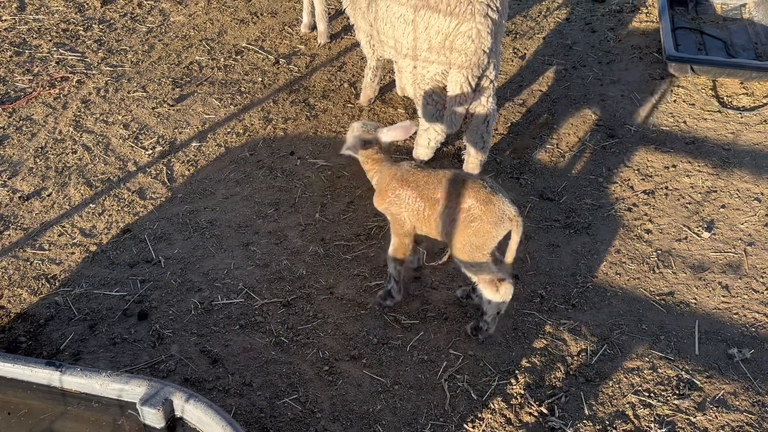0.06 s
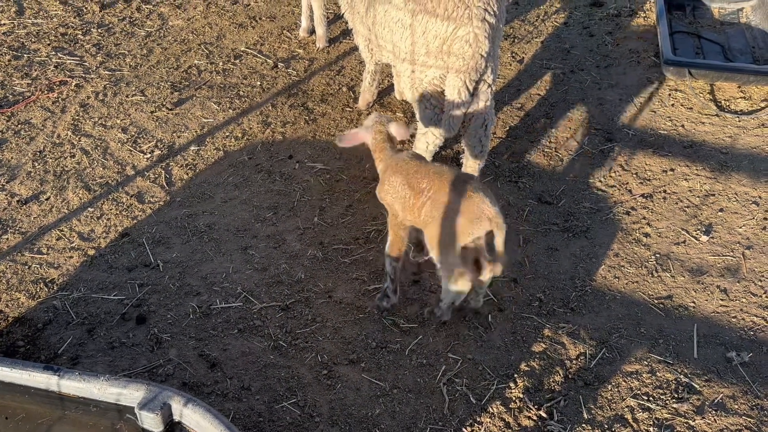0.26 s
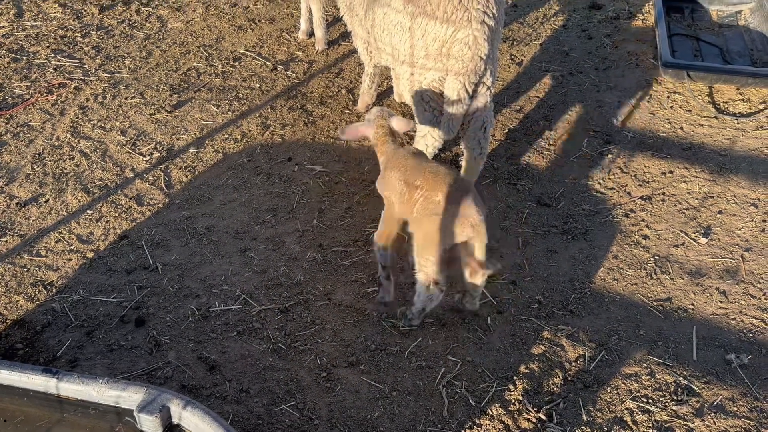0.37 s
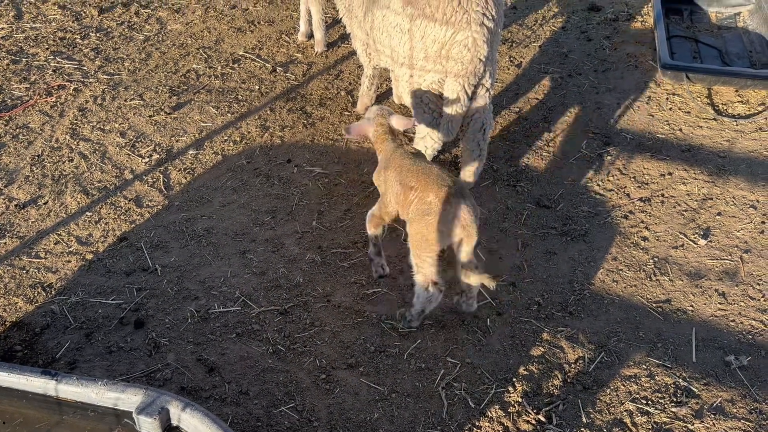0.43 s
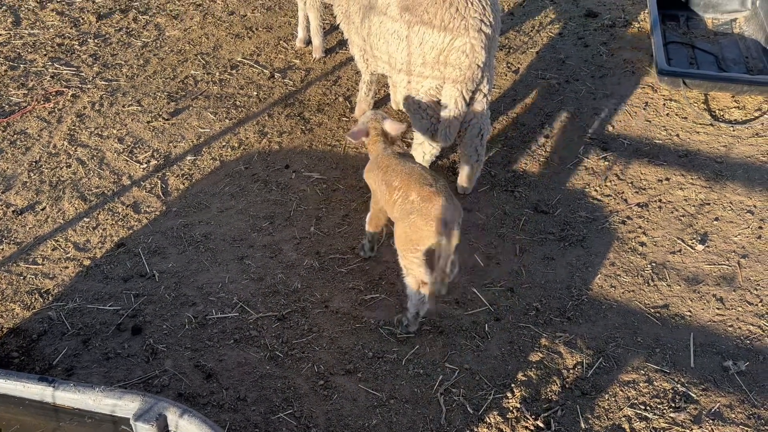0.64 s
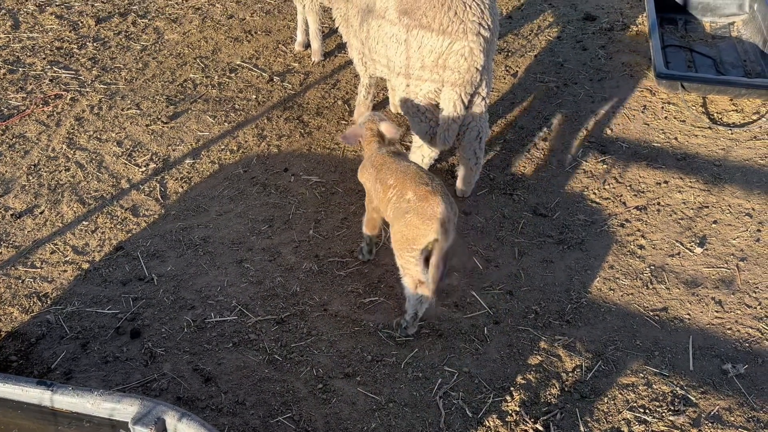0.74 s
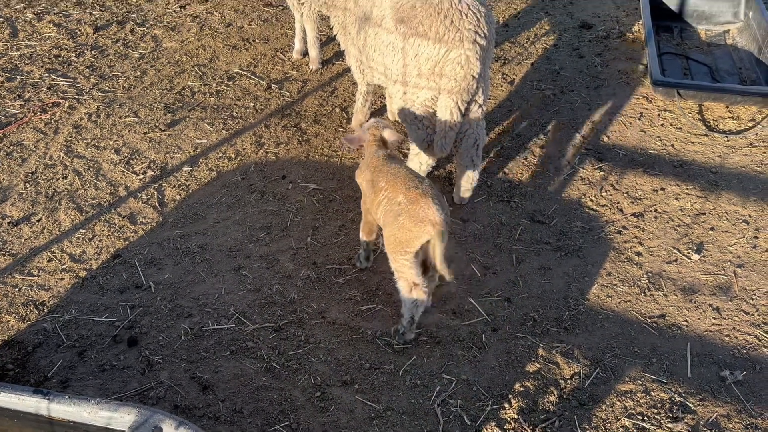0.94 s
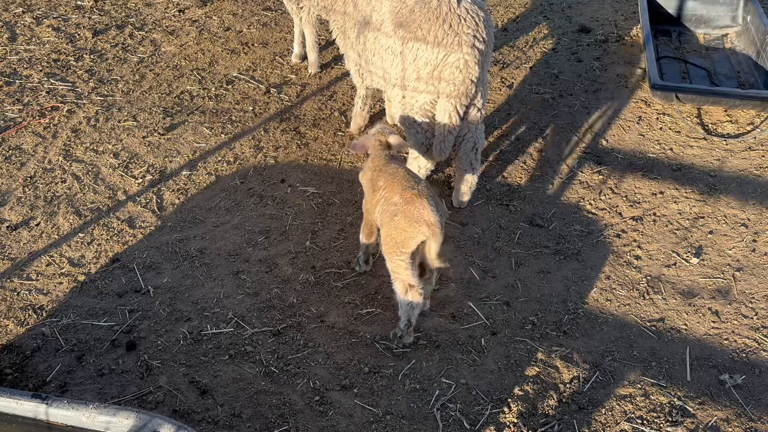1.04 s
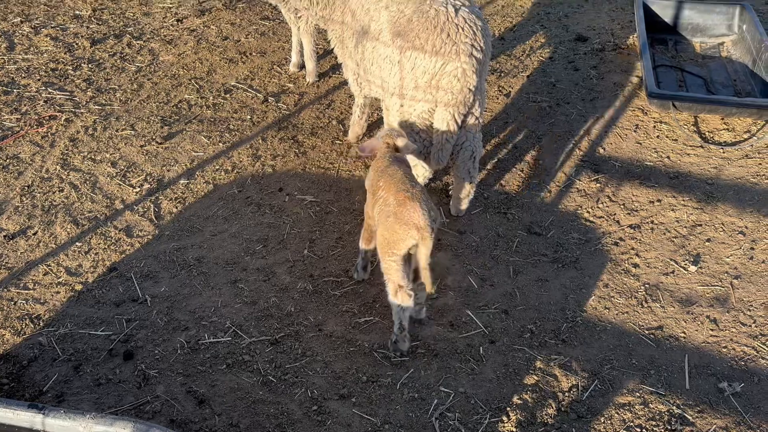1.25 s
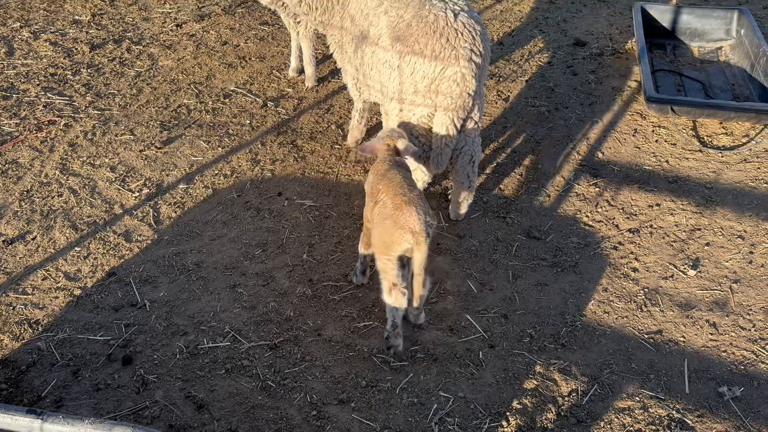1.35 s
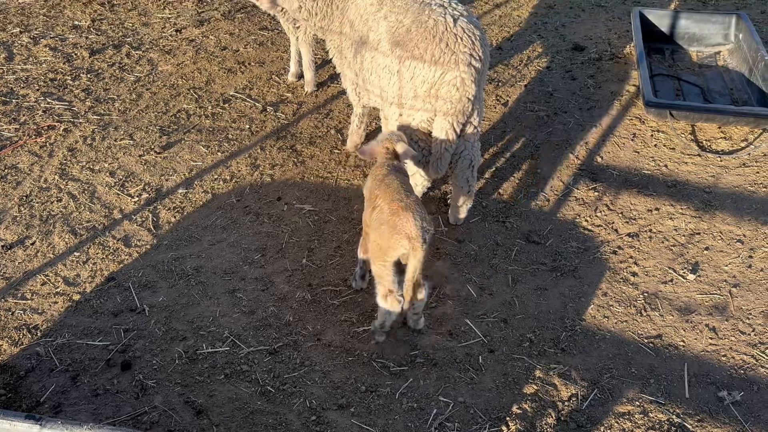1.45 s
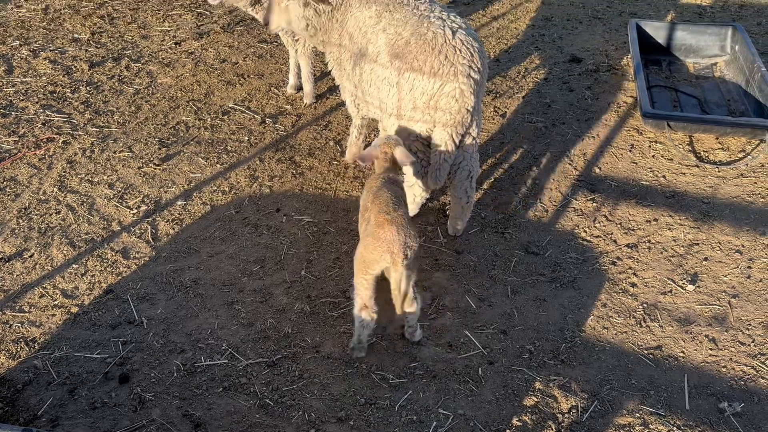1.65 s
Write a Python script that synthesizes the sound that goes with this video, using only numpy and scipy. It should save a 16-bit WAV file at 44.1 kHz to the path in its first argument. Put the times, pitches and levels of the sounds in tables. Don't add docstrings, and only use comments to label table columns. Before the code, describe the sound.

Outdoors in a farm pen, one sheep bleats near the phone: a brief muffled hum rising in pitch, a sustained raspy call, a weakening end, then only wind buffeting and a few faint straw ticks.

```python
import sys
import numpy as np
from scipy import signal
from scipy.fft import rfft, irfft, next_fast_len
from scipy.io import wavfile
from scipy.ndimage import uniform_filter1d

SR = 44100
rng = np.random.default_rng(int(sys.argv[2]) if len(sys.argv) > 2 else 0)


def materialize(psi):
    bounded = np.clip(np.atleast_2d(psi).T, -1, 1)
    quanta = np.round(bounded * 32767).astype(np.int16)
    wavfile.write(sys.argv[1], SR, quanta)


def gain_from_db(level_db):
    decades = np.asarray(level_db, float) / 20
    return 10 ** decades


N = 74970
T = np.arange(N) / SR
SIZE = next_fast_len(N + SR // 2)
F = np.maximum(np.fft.rfftfreq(SIZE, 1 / SR), 1e-3)

# time in seconds, pitch in Hz, level in dB.
GRUNT = [
    (0.11, 134.4, -75.5),
    (0.118, 127.1, -67),
    (0.144, 128.9, -44),
    (0.17, 118.2, -52),
    (0.204, 145.6, -41.5),
    (0.242, 163.1, -38),
    (0.266, 171.7, -37),
    (0.3, 176.3, -36.5),
]
# time in seconds, pitch in Hz, level in dB.
BLEAT = [
    (0.32, 180.5, -25.5),
    (0.344, 183.8, -22.5),
    (0.366, 173.1, -25.5),
    (0.382, 182.7, -21.5),
    (0.466, 179.1, -21.5),
    (0.57, 178.6, -21.5),
    (0.608, 177.1, -21),
    (0.685, 182, -21),
    (0.74, 179.9, -21),
]
# time in seconds, pitch in Hz, level in dB.
SAG = [
    (.787, 183.4, -22),
    (.812, 174.5, -23),
    (.845, 172.7, -26),
    (.87, 176.2, -25),
    (.906, 172, -24),
    (.927, 166.7, -30.5),
    (.95, 174.4, -24),
    (.982, 169.8, -26.5),
]
# time in seconds, pitch in Hz, level in dB.
RELEASE = [
    (.991, 164, -36.5),
    (1.006, 149, -34),
    (1.022, 137.1, -49),
    (1.07, 125.8, -65),
]
# time in seconds, timing scatter as a share of a period.
ROUGHNESS = [(.11, .04), (.19, .03), (.22, .003), (.345, .003), (.36, .012), (.385, .005), (.61, .005),
             (.64, .0015), (.79, .0015), (.81, .003), (.978, .003), (.995, .08)]
# time in seconds, strength of the strong-weak pattern in dB.
DOUBLING = [
    (.33, -40),
    (.355, -4),
    (.395, -9),
    (.46, -6.5),
    (.6, -7.5),
    (.625, -28),
    (.79, -34),
    (.81, -18),
    (.84, -30),
]
# centre in Hz, width in Hz, left in dB, right in dB.
DOUBLING_COLOUR = [(650, 40, 4.5, 2.5), (798, 49, -6, -0.5), (1050, 520, -10.5, -6),
                   (1517, 180, -13, -26.5), (2030, 40, 5.5, 2), (1990, 120, -5.5, -11), (2346, 110, 4, 12),
                   (2680, 150, -13, -2.5)]
# centre in Hz, width in Hz, left in dB, right in dB.
TIRED_COLOUR = [(1076, 120, -2, -6), (1480, 310, -6, -6.5), (1700, 190, 2.5, 4.5), (2260, 150, -4.5, -8.5),
                (2479, 390, 4.5, 7), (3298, 1000, 3.5, 2.5), (4380, 350, -2.5, -2), (5050, 800, 0, -5)]
# centre in Hz, width in Hz, left in dB, right in dB, right lag in ms.
SHUT_MOUTH = [(673, 160, -0.5, 2, 0.31), (832, 207, -1, -2, 0.074), (1103, 200, -3.5, -6.5, 0.099),
              (1690, 150, -1, -2.5, 0.37), (2045, 50, -4.5, -7, 0.28), (2990, 390, -10.5, -12, 0.16),
              (4700, 1100, -35.5, -30.5, 0.09), (7500, 1300, -29, -29.5, 0.058)]
# centre in Hz, width in Hz, left in dB, right in dB, right lag in ms.
OPEN_MOUTH = [(634, 110, -17.5, -45.5, 0.25), (736, 271, 1.13, 3, 0.26), (833.3, 123.6, 7.5, 7.5, 0.033),
              (1324, 657, -0.5, -5.5, 0.25), (1645, 120, 6.5, 1.5, 0.44), (1930, 142, 9, 2, 0.19),
              (2145, 150, 2, -9.5, 0.15), (2500, 220, -45, -8, 0.32), (2910, 430, -12.5, -12.5, 0.14),
              (3353, 180, -15.5, -13.5, 0.2), (3607, 360, -19, -20.5, 0.18),
              (4083, 360, -30.5, -33.5, 0.35), (4820, 900, -34.5, -32.5, 0.19),
              (6600, 2500, -33.5, -39.5, 0.055)]
# time in seconds, level relative to the voice in dB.
CHEST = [
    (.11, 8),
    (.2, -5),
    (.25, 1.5),
    (.3, 0.5),
    (.34, -16.5),
    (.8, -20),
    (.95, -18),
    (1.05, -6),
]
# centre in Hz, width in Hz, level relative to the voice in dB.
TEETH_HISS = [(9760, 590, -36), (10230, 2900, -29), (12700, 2700, -38), (14630, 1600, -40.5)]
# time in seconds, level in dB.
AIR_PRESSURE = [(.2, -13), (.25, -2), (.31, -3), (.345, 2.5), (.45, 2.5), (.79, -1), (.83, 1), (.935, -9),
                (.96, -7), (1.0, -9.5), (1.04, 4.5)]
# time in seconds, level in dB.
GUST = [(0, -51), (.1, -62), (.16, -52), (.3, -58), (.385, -41), (.505, -39), (.63, -45), (.7, -40),
        (.95, -46), (1.005, -58), (1.075, -60), (1.14, -43), (1.2, -50), (1.305, -40), (1.505, -37),
        (1.6, -41), (1.64, -47), (1.675, -60)]
# time in seconds, peak in dB, frequency in Hz.
THUMPS = [(0.026, -47, 52.5), (0.069, -53, 61), (0.203, -46, 68), (.262, -38.5, 55), (0.337, -44, 66.8),
          (0.38, -31.5, 63), (.417, -34.5, 79), (.449, -33, 63), (.474, -42, 57.4), (0.512, -29.5, 83.46),
          (0.555, -31.5, 78), (0.617, -39, 61), (.654, -37, 88.3), (0.683, -30, 71.5), (0.709, -32, 71),
          (0.759, -36.5, 65), (.803, -37.5, 63.64), (0.855, -36.5, 47.77), (0.901, -42, 55),
          (.944, -39, 61), (.985, -47, 54), (1.043, -39, 67), (1.101, -43, 55.5), (1.139, -34.5, 59),
          (1.174, -43.5, 59.94), (1.223, -41, 69), (1.259, -36.5, 53.7), (1.309, -28.5, 78.5),
          (1.363, -32, 60), (1.385, -32.5, 62), (1.431, -30, 69.4), (1.458, -32.5, 90), (1.491, -25, 85),
          (1.509, -23.5, 61.5), (1.557, -32, 67), (1.585, -36.5, 71.3), (1.609, -32.5, 85)]
# time in seconds, level in dB, frequency in Hz, length in seconds.
BUFFETS = [
    (0.162, -41.5, 145, 0.02),
    (0.375, -37.5, 103, 0.009),
    (0.51, -38, 112, .012),
    (0.693, -47, 115.5, 0.025),
    (1.026, -56, 260.7, 0.012),
    (1.311, -40.5, 127, 0.0041),
    (1.378, -55.5, 137, 0.0087),
    (1.458, -35, 157.4, 0.0093),
    (1.48, -33, 146.5, 0.012),
    (1.543, -43, 127, 0.026),
]
# frequency in Hz, density in dB per Hz.
YARD_COLOUR = [(250, 4), (450, -13), (800, -14.5), (1300, -18.5), (1850, -9.5), (2700, -21.5),
               (4000, -26.5), (15500, -29.5)]
# start in seconds, level in dB, decay in ms.
STRAW_TICKS = [
    (1.479, -59.5, 4.6),
    (1.5409, -72.5, 1.8),
    (1.565, -80.5, 4.8),
    (1.6985, -59, 2),
]
# centre in Hz, width in Hz.
HOUSING_DIPS = [(4680, 150), (5650, 150), (8900, 700), (13100, 800)]

MOUTH_OPENS_S = 0.296


def sheep():
    call = list(GRUNT) + list(BLEAT) + list(SAG) + list(RELEASE)
    phase = fold_phase(call)
    even, uneven = fold_pulses(phase)
    puff, burst = breath_puffs(phase)
    breath_level = (gain_from_db(-32) + 6 * curve(ROUGHNESS)) * np.std(even)
    breath = breath_level * unit(puff * rng.standard_normal(N))
    source = even + uneven + breath
    tiredness = ramp(0.795, 0.025)
    source = source + tiredness * (tint(source, TIRED_COLOUR) - source)
    fade_in = np.clip((T - call[0][0]) / 0.0071, 0, 1)
    fade_out = np.clip((call[-1][0] - T) / 0.019, 0, 1)
    loud = fade_in * fade_out * gain_from_db(curve(call, col=2) + 2)
    return mouth(source, even, loud) + chest_tone(phase, loud) + teeth_hiss(burst, loud)


def fold_phase(call):
    quaver_from_s, quaver_per_s, quaver_hz = 0.81, 24, 0.92
    quaver = np.sin(2 * np.pi * quaver_per_s * (T - quaver_from_s)) * (T > quaver_from_s)
    wobble_hz = 0.6 * walk(25)
    return np.cumsum(curve(call) + wobble_hz + quaver_hz * quaver) / SR


def fold_pulses(phase):
    k = np.arange(int(phase[-1]))
    jitter, shimmer = rng.standard_normal((2, len(k)))
    scatter = curve(ROUGHNESS)[np.searchsorted(phase, k)]
    times = np.interp(k + scatter * jitter, phase, T)
    even = clicks(times, gain_from_db(0.3 * shimmer))
    flicker_db = 5 * np.tanh(walk(35))
    uneven = clicks(times, (-1.) ** k) * gain_from_db(curve(DOUBLING) + flicker_db)
    from_hz, to_hz = 600, 4220
    above = (1 / (1 - 1j * from_hz / F)) ** 4
    below = 2 / (1 + 1j * F / to_hz) ** 2
    uneven = through(uneven, above * below * late(1.6))
    return even, tint(uneven, DOUBLING_COLOUR)


def breath_puffs(phase):
    cycle = np.minimum(phase.astype(int), int(phase[-1]) - 1)
    puff = np.exp(-(phase % 1) / 0.3)
    scatter_db = 2 * rng.standard_normal(cycle[-1] + 1)[cycle]
    doubling_db = 5 * gain_from_db(curve(DOUBLING)) * (-1.) ** cycle
    return puff, puff * gain_from_db(scatter_db + doubling_db)


def mouth(source, even, loud):
    closing = ramp(0.984, 0.015)
    opening = ramp(MOUTH_OPENS_S, 0.014) * (1 - 0.61 * closing)
    jaw = ramp(MOUTH_OPENS_S, 0.054) ** 2
    jaw_from_hz = 2700
    low = [row for row in OPEN_MOUTH if row[0] < jaw_from_hz]
    high = [row for row in OPEN_MOUTH if row[0] >= jaw_from_hz]
    dull = through(source, 1 / (1 + (F / 3000) ** 6))
    nose_dips = (1 - band(2300, 450)) * (1 - band(5700, 1200))
    nasal = through(source, nose_dips)
    shut_scale = np.std(throat(even, SHUT_MOUTH))
    open_scale = np.std(throat(even, OPEN_MOUTH))
    voice = throat(nasal * loud * (1 - opening), SHUT_MOUTH) / shut_scale
    voice = voice + throat(dull * loud * opening, low) / open_scale
    return voice + throat(source * loud * jaw, high) / open_scale


def throat(source, table):
    left = sum(gain_from_db(l) * band(hz, width * 1.256) ** 2 for hz, width, l, r, ms in table)
    right = sum(gain_from_db(r) * band(hz, width * 1.047) ** 2 * late(ms) for hz, width, l, r, ms in table)
    return through(source, np.array([left, right]))


def chest_tone(phase, loud):
    fundamental = np.sin(2 * np.pi * phase) * gain_from_db(curve(CHEST))
    octave = gain_from_db(-12 - 17.5) * np.sin(4 * np.pi * phase)
    tone = np.sqrt(2) * (fundamental + octave) * loud
    return through(tone, np.array([late(0), late(0.37)]))


def teeth_hiss(burst, loud):
    hiss = 0
    for hz, width, db in list(TEETH_HISS) + [(7300, 1500, -50)]:
        turbulence = burst * gain_from_db(1.3 * walk(20)) * rng.standard_normal(N)
        hiss = hiss + gain_from_db(db) * unit(through(turbulence, band(hz, width) ** 3))
    sideways = through(hiss, np.array([late(0), late(0.012)]))
    return sideways * loud * gain_from_db(curve(AIR_PRESSURE))


def pen(x):
    treble = 1 / (1 + (3000 / F) ** 8) / (1 + (F / 9000) ** 4)
    near = gain_from_db(-17) * tail(0.08) + gain_from_db(3) * tail(0.03) * treble
    fences = band(2200, 1300) ** 2 + gain_from_db(-8.5) * band(1100, 80) + gain_from_db(-17)
    far = gain_from_db(-33.5) * tail(0.71) * fences * late(84)
    return through(x, near + far)


def tail(t60):
    decay = 1000. ** (-T / t60) / np.sqrt(SR * t60 / 14)
    return rfft(rng.standard_normal((2, N)) * decay, SIZE)


def wind():
    out = rumble(57.4, 130 * 1.2) + gain_from_db(-50) * rumble(240, 160)
    out = out * gain_from_db(curve(GUST) - 4 + 1.5 * walk(3.9))
    for (s, db, hz), turn in zip(THUMPS, rng.random((len(THUMPS), 2))):
        swell = np.exp(-0.5 * ((T - s) * hz / 0.75) ** 2)
        out = out + gain_from_db(db) * swell * np.sin(2 * np.pi * (hz * (T - s) + turn[:, None]))
    for s, db, hz, length in BUFFETS:
        swell = np.exp(-0.5 * ((T - s) / length) ** 2)
        out = out + rumble(hz * 0.82, hz) * gain_from_db(db) * swell
    common, side = out
    return common + gain_from_db(-15.5) * side * np.array([[1], [-1]])


def rumble(hz, width):
    response = band(hz, width) ** 2 / (1 + (F / (2.48 * hz)) ** 8) / (1 + (36 / F) ** 4)
    x = through(rng.standard_normal((2, N)), response)
    span = int(2.5 * SR / hz)
    power = uniform_filter1d(uniform_filter1d(x ** 2, span), span)
    return x / np.sqrt(power)


def yard():
    hz, db_per_hz = np.array(YARD_COLOUR).T
    colour = gain_from_db(np.interp(np.log(F), np.log(hz), db_per_hz)) * (F > 200)
    out = unit(through(rng.standard_normal((2, N)), colour)) * gain_from_db(-73 + 2 * walk(16.0))
    stalk = band(7800, 15000) + 2.3 * band(900, 742) + 0.55 * band(3500, 780)
    for s, db, ms in STRAW_TICKS:
        snap = (T > s) * np.exp(-np.maximum(T - s, 0) * 1000 / ms) * rng.standard_normal(N)
        out = out + gain_from_db(db) * through(snap, stalk)
    return out


def curve(rows, col=1):
    return np.interp(T, np.array(rows)[:, 0], np.array(rows)[:, col])


def ramp(start, length):
    return np.clip((T - start) / length, 0, 1)


def band(hz, width):
    return 1 / (1 + 1j * (F / hz - hz / F) * hz / width)


def late(ms):
    return np.exp(-2j * np.pi * F * ms / 1000)


def through(x, response):
    return irfft(rfft(x, SIZE) * response, SIZE)[..., :N]


def tint(x, table):
    ports = [np.prod([1 + (gain_from_db(row[c]) - 1) * band(row[0], row[1]) for row in table], axis=0) for c in (2, 3)]
    return through(x, np.array(ports))


def unit(x):
    return x / np.sqrt(np.mean(x ** 2))


def walk(rate):
    return unit(through(rng.standard_normal(N), 1 / (1 + (F / rate) ** 4)))


def clicks(times, sizes):
    at = times[:, None] * SR
    idx = np.clip(np.floor(at).astype(int) + np.arange(-7, 9), 0, N - 1)
    taps = np.sinc(idx - at) * (1 + np.cos(np.pi * (idx - at) / 8)) / 2
    return np.bincount(idx.ravel(), (taps * sizes[:, None]).ravel(), N)


def scene():
    voice = sheep()
    return voice + pen(voice) + wind() + yard()


def band_limit(x):
    return signal.sosfilt(signal.butter(12, 15730, fs=SR, output="sos"), x)


def record(dry):
    housing = np.prod([1 - 0.85 * band(hz, width) for hz, width in HOUSING_DIPS], axis=0)
    coloured = through(dry, housing)
    low_pass = signal.ellip(8, 0.2, 70, 15750, fs=SR, output="sos")
    mix = signal.sosfilt(low_pass, coloured)
    return band_limit(mix)


dry = scene()
out = record(dry)
materialize(out)
```